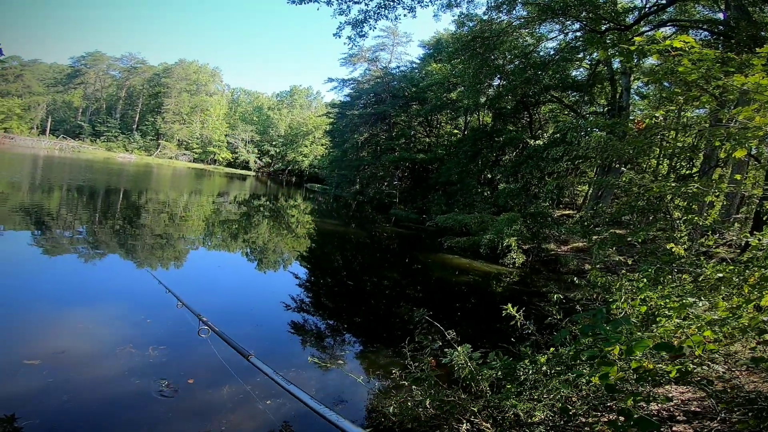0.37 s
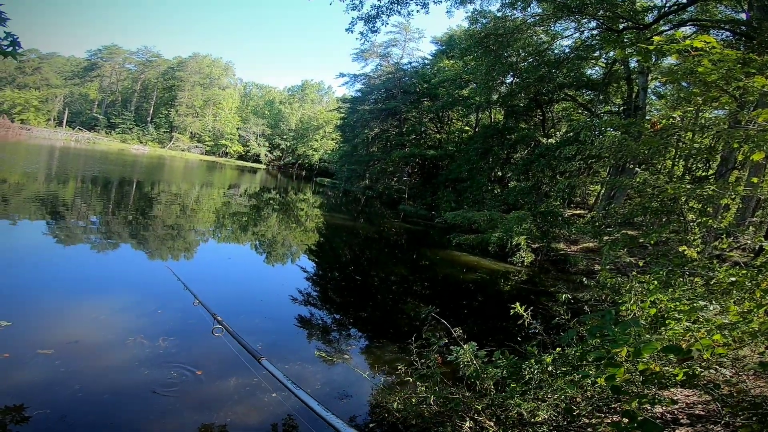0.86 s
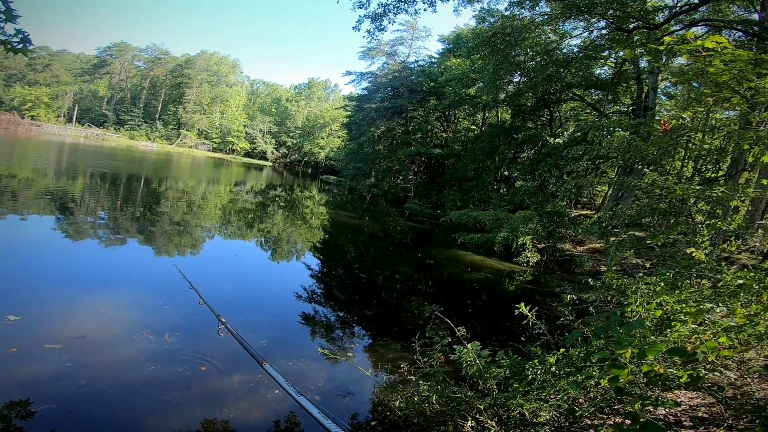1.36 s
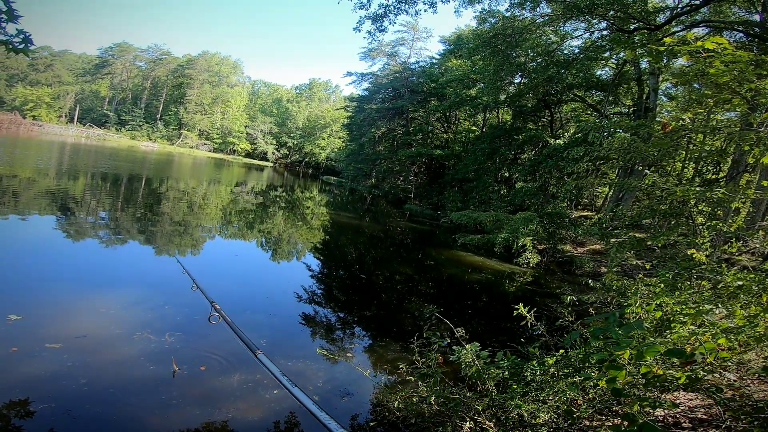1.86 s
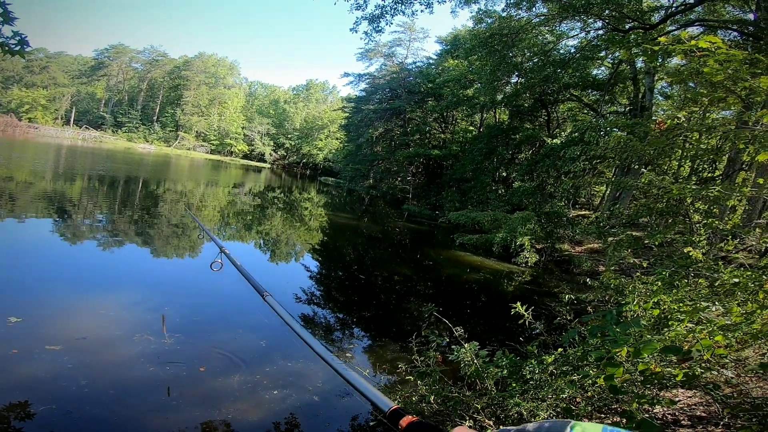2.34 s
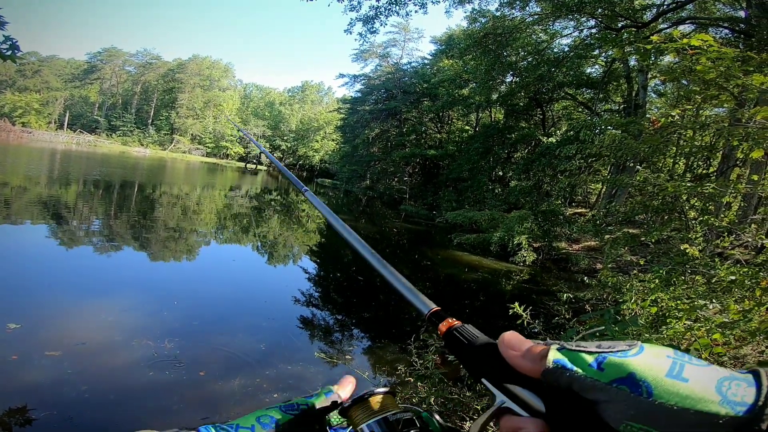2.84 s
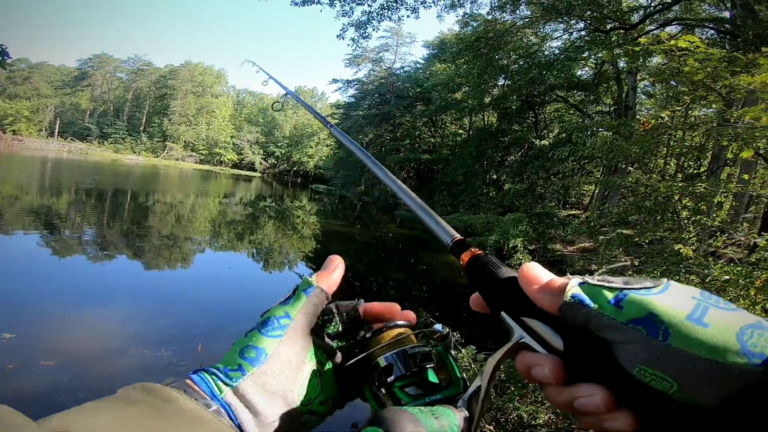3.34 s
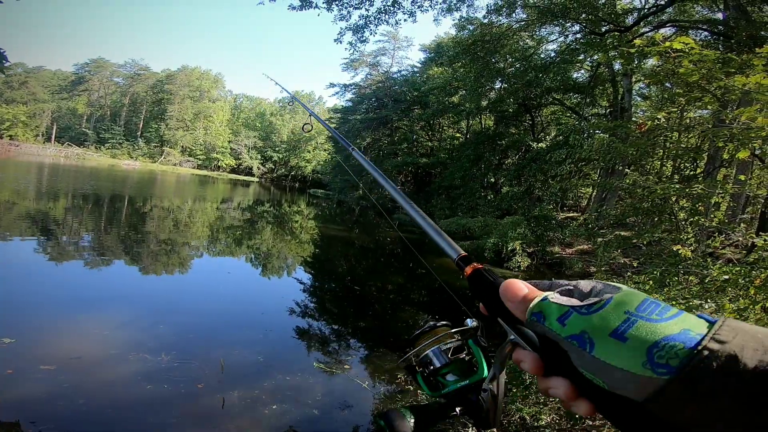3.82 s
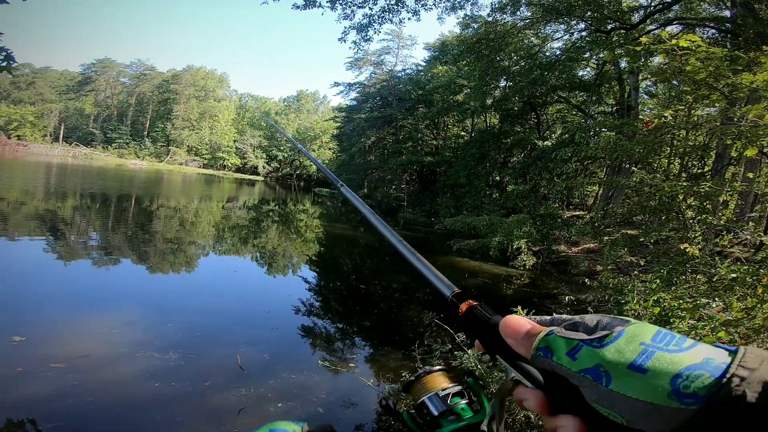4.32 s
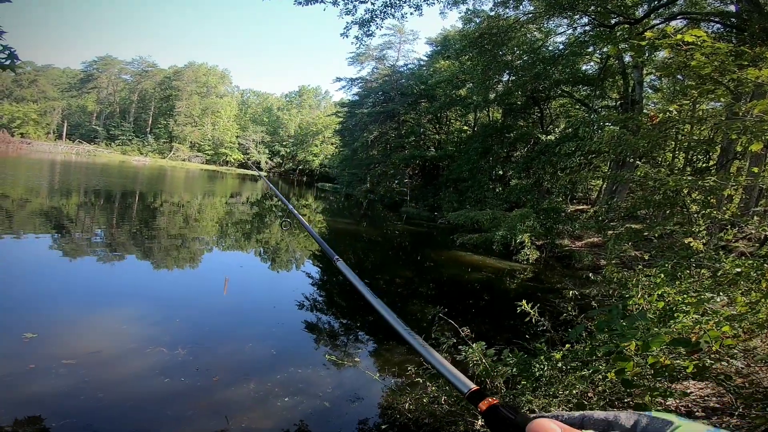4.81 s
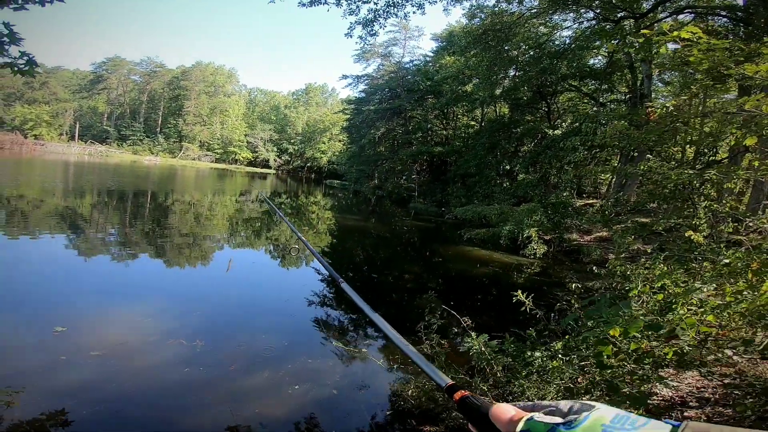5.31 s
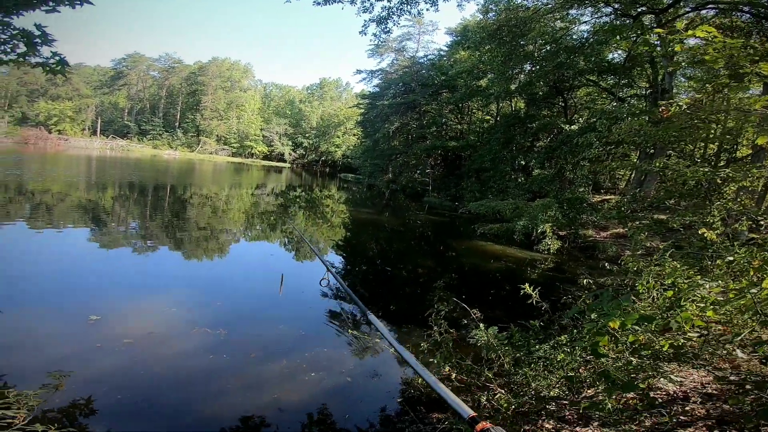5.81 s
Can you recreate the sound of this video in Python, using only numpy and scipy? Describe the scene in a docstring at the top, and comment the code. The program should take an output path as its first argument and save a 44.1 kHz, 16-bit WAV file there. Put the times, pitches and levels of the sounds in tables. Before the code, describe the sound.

Outdoors at a wooded pond, a steady far insect chorus hisses with a fast cricket trill on the right. Cloth rustles and soft bumps come from a chest-worn microphone. After a few light ticks, a fishing reel's bail snaps shut very loudly near the middle, rattling briefly; scattered clicks follow, then a rod knock and a sharp tick at the end. A bird pipes thinly.

```python
"""A far insect chorus drones over a wooded pond bank: bands of flickering noise, with one cricket trilling on the right.
Close by, hands shift on a rod, the reel's bail snaps shut and its parts tick: brief scrapes ring decaying modes.
Hiss, cloth, wind and rumble are noise of varying level; a bird pipes gliding whistles and bubbles are short gliding tones.
All is heard at two chest-worn microphone ports; the image begins nearly mono and opens out to stereo."""
import sys
import numpy as np
from scipy import signal
from scipy.fft import rfft, irfft, next_fast_len
from scipy.io import wavfile
from scipy.ndimage import uniform_filter1d

SR = 44100
rng = np.random.default_rng(int(sys.argv[2]) if len(sys.argv) > 2 else 0)


def rack_gain(trim_db):
    """Turn a fader trim in dB into the linear factor to multiply a signal by."""
    fader = np.asarray(trim_db, float)
    return 10 ** (fader / 20)


def log_audio(samples):
    """Write samples as a 16-bit WAV file to the path given in sys.argv[1]."""
    # one column per channel
    frames = np.atleast_2d(samples).T
    # limit to full scale, then quantise
    limited = np.clip(frames, -1, 1)
    pcm = np.round(limited * 32767).astype(np.int16)
    wavfile.write(sys.argv[1], SR, pcm)


N = 272097

# modes of the small rod and reel parts, low to top: (frequency [Hz], relative level [dB], t60 [s])
LOW_MODES = [(349, -2.5, 0.0163), (478, 2, 0.0183), (599.2, 1, 0.0184), (782.5, 3, 0.022),
             (1017, -2, 0.01444)]
MIDDLE_MODES = [(1134, 2.15, 0.0159), (1415, 3.26, 0.0143), (1859, -0.78, 0.0223), (2120, 4.84, 0.0103)]
UPPER_MODES = [(2630, -3, 0.00346), (3138, 4.5, 0.00928), (3422, 8.5, 0.00664), (3802, 2, 0.0203),
               (4160, -4.5, 0.009), (4463, 8.5, 0.00892), (4296, -7.5, 0.00492), (5560, 6.5, 0.0112),
               (6280, -3.5, 0.0093), (6350, 7, 0.0131), (6935, 7.5, 0.0074)]
TOP_MODES = [(7600, 10.5, 0.0086), (8407, 10, 0.0112), (8620, 6.5, 0.0072), (9800, -11.5, .007),
             (11100, -26, .006), (13000, -28, .005)]


def curve(table):
    """Columns of a time table, one value a sample."""
    s, *columns = np.transpose(table)
    return [np.interp(np.arange(N) / SR, s, column) for column in columns]


def level_gain(table):
    """A (time [s], level [dB]) table as a gain curve."""
    return rack_gain(curve(table)[0])


def walk(rate):
    """Random levels held 1 / rate s and slewed twice; spread near 1."""
    hold = int(SR / rate)
    steps = np.repeat(rng.standard_normal(N // hold + 1), hold)
    slewed = uniform_filter1d(uniform_filter1d(steps, hold), hold)
    return 0.836 * slewed[:N]


def on_log(table, hz):
    """A spectrum table read on a log axis."""
    table_hz, db = np.transpose(table)
    return np.interp(np.log(hz), np.log(table_hz), db)


def noise(spectrum, flicker_db, rate, count):
    """Mid and side noise of one colour, mid rms 1, in overlapping bands that flicker apart."""
    # stereo width of the noises: (frequency [Hz], side against mid [dB])
    width = [(60, -7), (110, -10.5), (200, -10), (380, -6.5), (700, 0), (1290, 1), (2380, -8.5), (4400, -9),
             (8120, -0.5), (15000, -1.5)]
    low_hz, high_hz = spectrum[0][0], spectrum[-1][0]
    size = next_fast_len(N)
    hz = np.maximum(np.arange(size // 2 + 1) * SR / size, 1)
    inside = (hz > low_hz) & (hz < high_hz)
    colour = rack_gain(on_log(spectrum, hz)) * inside
    pair = rfft(rng.standard_normal((2, size))) * [colour, colour * rack_gain(on_log(width, hz))]
    place = np.log(hz / low_hz) / np.log(high_hz / low_hz) * (count - 1)
    out = np.zeros((2, N))
    for k in range(count):
        band = pair * np.clip(1 - abs(place - k), 0, 1)
        out += irfft(band, size)[:, :N] * rack_gain(flicker_db * walk(rate))
    return out / out[0].std()


def pan(db):
    """Left and right gains whose mean is 1, from left minus right in dB."""
    left = 2 / (1 + rack_gain(-np.asarray(db)))
    return np.array([left, 2 - left])


def swells(rows, rest_db):
    """Bell-shaped swells over a steady rest, added as power; a length spans the points 5 dB down."""
    t = np.arange(N) / SR
    power = sum(rack_gain(2 * db) * np.exp(-(2.15 * (t - s) / length) ** 2) for s, db, length in rows)
    return np.sqrt(rack_gain(2 * rest_db) + power)


def insect_chorus():
    """Countless far insects blur into two layers of flickering noise."""
    # chorus colours: (frequency [Hz], relative density [dB])
    main_colour = [(1060, -40.5), (1800, -25.5), (2150, -17.5), (2340, -9.5), (2570, -4.5), (3240, 1.5),
                   (4660, -2.5), (6270, -2.5), (6700, -8.5), (8710, -30), (14700, -120)]
    high_colour = [(6300, -11.5), (6700, -6), (7200, -6), (7600, -0.5), (8300, -5.5), (8600, -14),
                   (9000, -22.5)]
    # slow levels of the two layers: (time [s], level [dB])
    main_level = [(0, -38), (.8, -38), (1.3, -39), (2.5, -40), (3.3, -40.5), (4.5, -41.5), (6.17, -41)]
    high_level = [(0, -61), (.9, -60.5), (1.2, -55), (1.55, -51), (1.7, -47), (3.2, -46.5), (3.6, -47.5),
                  (4.3, -46), (6.17, -47)]
    main = level_gain(main_level) * noise(main_colour, 1.0, 9, count=7)
    return main + level_gain(high_level) * noise(high_colour, 0.75, 15, count=4)


def high_hiss():
    """A high hiss above the chorus throbs quickly, its depth and level changing."""
    # hiss colour: (frequency [Hz], relative density [dB])
    colour = [(5120, -33), (8700, -5), (13200, -2.5), (14600, -10.5), (15250, -9.5), (15400, -40),
              (16000, -71)]
    # slow level before the throb: (time [s], level [dB])
    slow_level = [(0, -55.5), (.9, -60), (1.5, -55), (2.35, -49.5), (2.48, -57.5), (3.3, -54.5),
                  (3.6, -54.5), (4.05, -51.5), (4.93, -49), (5.05, -59), (5.3, -55.5), (6.17, -53.5)]
    # throb: (time [s], rate [1/s], swing to either side [dB])
    throb_table = [(0, 46.8, 3.5), (.75, 46.8, 3), (1.1, 48, .5), (1.8, 49.6, 2), (2.4, 49.6, 2),
                   (2.5, 49.6, .3), (6.17, 49.6, .8)]
    per_s, depth_db = curve(throb_table)
    throb = rack_gain(depth_db * np.cos(2 * np.pi * np.cumsum(per_s) / SR + 2.1))
    return level_gain(slow_level) * throb * noise(colour, 3.24, 35, count=10)


def sleeve():
    """Cloth scratches in grains, swelling with each move over a faint steady rustle."""
    # rustle colour: (frequency [Hz], relative density [dB])
    colour = [(210, -20.5), (350, -8), (382, -4), (532, -12.5), (591, -4.5), (752, -3.5), (1580, -9),
              (2040, -7), (2400, -9), (3120, -53), (5280, -120)]
    # sleeve moves, before the grains: (time [s], peak level [dB], length [s])
    moves = [(.05, -56, 0.91), (.33, -53, 0.19), (2.14, -56, 0.171), (2.79, -54, 0.114), (3.05, -60, .25),
             (3.39, -52.5, 0.136), (3.54, -54.5, 0.244), (4.02, -54.5, 0.253), (4.33, -57, 0.192),
             (4.64, -52, 0.341), (4.8, -61.5, 0.236), (5.18, -56, 0.14), (5.6, -54, 0.394),
             (5.82, -66, 0.19), (6.07, -49.5, 0.48)]
    grains = rack_gain(2.53 * walk(60))
    return swells(moves, rest_db=-61.5) * grains * noise(colour, 3.94, 15, count=4)


def rumble():
    """A far low noise that slowly rises and sinks."""
    # rumble colour: (frequency [Hz], relative density [dB])
    colour = [(62, -34), (105, -13.5), (151, 0.5), (225, -3.5), (349, -12), (380, -12), (411, -20),
              (500, -21), (650, -46.5), (1100, -120)]
    # slow level: (time [s], level [dB])
    slow_level = [(0, -51.5), (.85, -51.5), (1.7, -55), (2.7, -55.5), (3.2, -57.5), (3.6, -52.5),
                  (4.2, -57.5), (4.6, -55), (5.3, -58), (5.7, -55.5), (6.17, -50.5)]
    return level_gain(slow_level) * noise(colour, 1.46, 8, count=3)


def wind():
    """Wind gusts on the ports: puffs of very low noise, all of one length, over a calm."""
    # wind colour: (frequency [Hz], relative density [dB])
    colour = [(15, -30), (25, -3.5), (50, -5.5), (100, -3), (125, -15)]
    # puffs, before the gusting: (time [s], peak level [dB])
    puffs = [(.02, -50.5), (.2, -49.5), (.36, -54.5), (.64, -48.5), (1.2, -58), (1.66, -55.5), (2.1, -58),
             (2.2, -54), (2.49, -64), (2.73, -61.5), (3.25, -56), (3.44, -47), (3.88, -57), (4.07, -59.5),
             (4.8, -63), (5.16, -55.5), (5.31, -57.5), (5.6, -66), (5.81, -58), (6.07, -71)]
    puff_s = 0.0894
    gusts = swells([(s, db, puff_s) for s, db in puffs], rest_db=-68.5) * rack_gain(1.82 * walk(6.3))
    return gusts * noise(colour, 1.8, 8, count=2)


def bed():
    """The continuous noises, summed as mid and side and turned into left and right."""
    mid, side = insect_chorus() + high_hiss() + sleeve() + rumble() + wind()
    return np.array([mid + side, mid - side])


def cricket():
    """A trunk sends each stroke back from the left; a second, fainter cricket keeps time further back."""
    # near cricket: (time [s], level [dB], left minus right [dB], echo against direct [dB])
    trill = [(0, -58, -11.5, -17.5), (.5, -58, -10.5, -14), (.8, -51.5, -7, -14), (1.3, -47.5, -9, -14),
             (1.7, -47, -12.5, -17.5), (2.6, -47, -8, -11.5), (2.85, -57, -11, -3), (3.2, -49.5, -8.5, -2),
             (3.6, -49.5, -8.5, -9), (4.0, -46, -10.5, -6.5), (4.4, -52, -8, -1.5), (4.8, -48, -15.5, -9),
             (5.4, -44.5, -21.5, -19.5), (5.6, -45, -13.5, -19.5), (6.17, -43, -9.5, -14)]
    # far cricket: pitch [Hz], level [dB], lead of its strokes [s]
    far_hz, far_db, lead_s = (7580, -62, .014)
    first_stroke_s, echo_s = -.004, 0.02414
    cricket_hz, flat_hz, settle_s = 8170, 290, .8
    db, pan_db, echo_db = curve(trill)
    # the pitch starts flat and settles
    pitch_hz = cricket_hz - flat_hz * np.exp(-np.arange(N) / SR / settle_s)
    tone = strokes(pitch_hz, first_stroke_s) * rack_gain(db)
    echo = np.roll(tone, int(echo_s * SR)) * rack_gain(echo_db + 2.9 * walk(150))
    # the ports lie a good part of a wavelength apart, so the phases [rad] differ
    lead = np.exp(1j * np.array([[2.2], [0]]))
    near = (tone * lead * pan(pan_db) + echo * pan([4.0]) / lead).imag
    far = strokes(far_hz, first_stroke_s - lead_s).imag * rack_gain(far_db + 2.0 * walk(2.8))
    return near + scatter(tone.imag, -30.5, 0.171) + far


def strokes(pitch_hz, first_s):
    """Even wing strokes, each a short arched whistle with small chances in pitch and level; rms 1."""
    # pitch along one stroke: (share of stroke, offset from the pitch [Hz])
    arch = [(0, -140), (.35, 20), (.6, -70), (1, -420)]
    strokes_per_s, stroke_s = 17.12, 0.023
    turns = (np.arange(N) / SR - first_s) * strokes_per_s
    along = np.clip(turns % 1 / strokes_per_s / stroke_s, 0, 1)
    chance = rng.standard_normal((int(turns[-1]) + 1, 2))[turns.astype(int)].T
    hz = pitch_hz * (1 + 0.0036 * chance[0]) + np.interp(along, *np.transpose(arch))
    swell = np.sin(np.pi * along ** 0.655) * rack_gain(1.0 * chance[1] + 2.88 * walk(300))
    tone = swell * np.exp(2j * np.pi * np.cumsum(hz) / SR)
    return tone / tone.imag.std()


def scatter(x, wet_db, t60):
    """Leaves and trunks return a short random tail, another to each port."""
    t = np.arange(SR // 5) / SR
    tail = rng.standard_normal((2, len(t))) * rack_gain(wet_db - 60 * t / t60)
    return signal.fftconvolve(x[None], tail, axes=1)[:, :N]


def tackle():
    """All handling blows: harness bumps, bail, small parts and rod blank, each ringing its own modes."""
    out = np.zeros((2, N + SR))
    bumps(out)
    bail(out)
    ticks(out)
    rod(out)
    return out[:, :N]


def bumps(out):
    """Dull bumps through the harness, each one heavily damped low mode."""
    # bumps: (time [s], peak level before panning [dB], nominal pitch [Hz])
    bump_table = [(0.218, -39.5, 107.6), (.252, -34.5, 110), (0.272, -37.5, 116), (0.301, -35.5, 193),
                  (3.409, -23, 201), (3.43, -43.5, 59.7), (3.861, -36.5, 69.7), (3.881, -36, 111.7),
                  (5.148, -36, 200.5), (5.161, -44.5, 170), (6.065, -37.5, 167.7)]
    bump_t60_s = 0.0278
    for s, db, hz in bump_table:
        add(out, s, db, -1.5, [(hz, 0, bump_t60_s)], .3)


def bail(out):
    """The bail wire rings on from blows, snaps in a blur of bounces and chatters against its stop."""
    # bail wire modes: (frequency [Hz], relative level [dB], t60 [s])
    wire_modes = [(725.2, 1.5, 0.0817), (746.7, -3.5, 0.083), (892, -6.5, 0.086), (1068, -10.5, 0.09),
                  (1241, -10.5, 0.077), (1414.5, -15.5, .06), (1650, -15.5, 0.043), (1954, -21, 0.036),
                  (2185, -10, .1), (2220, -9.5, 0.11)]
    # blows on the wire: (time [s], peak level before panning [dB], left minus right [dB])
    blows = [(2.167, -42, -9), (3.393, -17, -27), (3.431, -19, -23.5), (3.446, -20, -16.5),
             (3.462, -29, -15), (3.489, -29, -16.5), (4.295, -41, -15), (4.338, -40.5, -16.5),
             (4.763, -42.5, -19.5)]
    # the snap: (time [s], bounce peak before panning [dB])
    snap = [(3.4012, -3.5), (3.4062, -15), (3.4085, -20.5), (3.43, -28), (3.455, -40)]
    # the chatter: (time [s], bounce reference level [dB]); the wire rings 7 dB below it, the small parts 1 dB
    # above
    chatter = [(3.395, -42.5), (3.43, -24.5), (3.47, -33), (3.485, -33.5), (3.5, -39), (3.56, -43)]
    for s, db, pan_db in blows:
        add(out, s, db, pan_db, wire_modes, .6)
    for s, db in bounces(chatter, 350.):
        add(out, s, db - 7, -10.5, wire_modes, .8)
        add(out, s, db + 1.0, -8.0, LOW_MODES + MIDDLE_MODES, .8)
    for s, db in bounces(snap, 1700.):
        add(out, s, db, -5.0, UPPER_MODES[2:] + TOP_MODES[:3], .9)


def bounces(table, per_s):
    """Up to 120 uneven bounces, 1.1 / per_s s apart on average, with levels read along a curve."""
    times, db = np.transpose(table)
    s = times[0] + np.cumsum(rng.uniform(.3, 1.9, size=120)) / per_s
    s = s[s < times[-1]]
    return zip(s, np.interp(s, times, db))


def ticks(out):
    """Ticks and knocks spread over all small parts; soft ones favour one pitch."""
    # ticks: (time [s], upper-mode peak before panning [dB], then against it: top, middle, low [dB])
    tick_table = [(2.3545, -31.5, -9, -9, -16.5), (2.5848, -31.5, -16.5, -29.5, -8.5),
                  (2.7658, -21, -1.5, -13.5, -31.5), (2.7713, -23, -5, -8.5, -16),
                  (3.3375, -23.5, -2, -10.5, -36.5), (3.3753, -21, -12, -9.5, -16.5),
                  (3.3906, -4, -20, -36, -20), (3.3935, -8, -14, -26, -20),
                  (3.4012, -3.5, -12.5, -31.5, -24), (3.406, -3, -21, -48.5, -27),
                  (3.4143, -15, -13.5, -16.5, -8.5), (3.419, -17, -5, -22, -15),
                  (3.4244, -13, -12, -19, -13), (3.4294, -17, -14, -8.5, -5),
                  (3.505, -15.5, -33, -27.5, -17), (3.8623, -30, -11, -8, -12),
                  (3.984, -19, -9, -5.5, -5.5), (3.9952, -21, 7, -9, -14.5), (4.0524, -12, 3, -10, -21),
                  (4.1371, -37.5, -11, -22.5, -2.5), (4.1833, -16, 0, -26, -19),
                  (4.1935, -24, -13, -9, -15), (4.5591, -33, 13.5, -13.5, -21.5),
                  (4.5878, -21, -11.5, -17, -22), (4.5934, -27, -2.5, -8, -25.5),
                  (4.8644, -31, -6, -25.5, -9.5), (5.1566, -31, -10, -7.5, -10),
                  (5.1667, -34.5, -15, -25, -3.5), (5.1793, -28.5, -14.5, -16, -2),
                  (5.426, -34.5, -9.5, -24, -10.5), (5.619, -33, -21.5, -23.5, -8.5),
                  (5.7332, -29, -13.5, -6.5, -8.5), (5.8534, -39, -8.5, -8.5, -2), (5.892, -35, -8, 5, 7),
                  (5.902, -35.5, -2, 3.5, 5), (6.0295, -41.5, -1, -4, 2), (6.0628, -13, -4, -6, -13),
                  (6.1026, -27.5, 4, -11.5, -10.5)]
    # softness is full at soft_db below full scale
    focus_hz, fall_db_per_octave, soft_db = 3000, 12., 13.
    for s, db, top_db, middle_db, low_db in tick_table:
        fall_db = fall_db_per_octave * np.clip(-db / soft_db, 0, 1)
        upper = [(hz, mode_db - fall_db * abs(np.log2(hz / focus_hz)), t60) for hz, mode_db, t60 in UPPER_MODES]
        # the reel hangs to the right, and the treble is shadowed most
        add(out, s, db + low_db, -5.0, LOW_MODES, .5)
        add(out, s, db + middle_db, -5.5, MIDDLE_MODES, .8)
        add(out, s, db, -4.0, upper, .6)
        add(out, s, db + top_db, -8.0, TOP_MODES, 1.5)


def rod(out):
    """The struck rod blank rings by itself."""
    # rod blank modes: (frequency [Hz], relative level [dB], t60 [s])
    blank_modes = [(366.1, 2, 0.104), (443, -8, 0.0346), (640, -18.5, 0.143), (727, -12.5, 0.089),
                   (894, -8, 0.0307), (1133, -11, 0.0226)]
    # blows: (time [s], peak level before panning [dB], left minus right [dB])
    blows = [(5.87, -24, -1.5), (5.878, -25.5, -0.55), (5.901, -30.5, -1.5), (5.906, -18, -1.2)]
    for s, db, pan_db in blows:
        add(out, s, db, pan_db, blank_modes, .1)


def add(out, s, db, pan_db, modes, apart):
    """One brief scrape rings the modes with random strengths; `apart` scales the left port's phase lead [rad]."""
    contact_s, mode_scatter_db = .00015, 2.5
    t = np.arange(SR // 8) / SR
    push = SR // 200
    scrape = rng.standard_normal(push) * np.exp(-t[:push] / contact_s)
    hz, mode_db, t60 = np.transpose(modes)[:, :, None]
    size, detune, lead = rng.standard_normal((3, len(modes), 1))
    # each mode takes about a cycle to build up
    build_up = 1 - np.exp(-(1.32 * t * hz) ** 2)
    fade = rack_gain(mode_db + mode_scatter_db * size - 60 * t / t60) * build_up
    # long-ringing sets are detuned less
    detuned_hz = hz * (1 + 0.03 * detune * min(.02 / t60.max(), 1))
    phase = 2 * np.pi * detuned_hz * t
    left = (fade * np.sin(phase + apart * abs(lead))).sum(0)
    right = (fade * np.sin(phase)).sum(0)
    ring = signal.fftconvolve(np.array([left, right]), scrape[None])[:, :len(t)]
    i = int(s * SR)
    out[:, i:i + len(t)] += ring / abs(ring[1]).max() * rack_gain(db) * pan([pan_db])


def bubbles():
    """Short tones that glide as the bubble nears the surface."""
    # bubbles in the pond: (time [s], start [Hz], end [Hz], length [s], peak level [dB])
    bubble_table = [(0.303, 722, 560, 0.0287, -45), (0.327, 531, 946, 0.0405, -47.5)]
    out = np.zeros(N)
    for s, hz0, hz1, length, db in bubble_table:
        along = np.linspace(0, 1, int(length * SR))
        hz = hz0 + (hz1 - hz0) * along
        tone = np.sin(np.pi * along ** 0.3) * np.sin(2 * np.pi * np.cumsum(hz) / SR)
        out[int(s * SR):][:len(along)] += rack_gain(db) * tone
    return out


def bird():
    """Thin gliding whistles that waver and throb, half lost in the trees."""
    # notes, before waver and flicker: (time [s], length [s], start [Hz], end [Hz], level [dB])
    notes = [(1.098, .061, 7950, 8160, -41), (1.709, .08, 6350, 6300, -37), (1.804, .06, 6260, 6350, -39.5),
             (3.10, .07, 6400, 6590, -39), (3.168, .075, 6200, 6090, -34), (3.28, .083, 6395, 6460, -34),
             (4.63, .086, 5950, 6500, -40), (4.739, .086, 7743, 7830, -31), (4.744, .1, 6219, 6160, -32.5),
             (4.85, .085, 6787, 6930, -38)]
    throb_per_s = 62.9
    song = np.zeros(N, complex)
    waver = 0.00593 * walk(70)
    for s, length, hz0, hz1, db in notes:
        t = np.arange(int(length * SR)) / SR
        i = int(s * SR)
        throb = 1 - 0.67 * np.cos(np.pi * throb_per_s * t) ** 2
        swell = np.sin(np.pi * (t / length) ** 0.94) ** 0.46 * throb
        hz = np.linspace(hz0, hz1, len(t)) * (1 + waver[i:i + len(t)])
        song[i:i + len(t)] += rack_gain(db) * swell * np.exp(2j * np.pi * np.cumsum(hz) / SR)
    song = song * rack_gain(1.75 * walk(120))
    # the left port leads in phase [rad]
    lead = np.exp(1j * np.array([[1.2], [0]]))
    return (song * lead * pan([1.5])).imag + scatter(song.imag, -35, .3)


def scene():
    """All sources at the two ports; the trees return the tackle's blows."""
    near = tackle()
    return bed() + cricket() + bird() + near + scatter(near.mean(0), -43, 0.213) + bubbles()


def band_limit(x):
    """A steep low-pass at the top of the band."""
    return signal.sosfilt(signal.butter(12, 16230, fs=SR, output="sos"), x)


def record(dry):
    """The side signal fades in; gain sinks after loud sounds; peaks clip; the top is cut."""
    # stereo opening: (time [s], side gain [dB])
    opening = [(0, -15.5), (.65, -15), (.85, -9.5), (1.1, -5), (1.7, 1.5), (6.2, 2.5)]
    # gain control: power where it starts to act, memory, exponent; then the top cut
    hold_db, memory_s, squeeze, top_hz = -27, 0.715, 0.2096, 15200
    mid = (dry[0] + dry[1]) / 2
    side = (dry[0] - dry[1]) / 2 * level_gain(opening)
    keep = np.exp(-1 / (memory_s * SR))
    quick_power = signal.lfilter([.002], [1, -.998], mid ** 2)
    power = signal.lfilter([1 - keep], [1, -keep], quick_power)
    gain = (1 + power / rack_gain(2 * hold_db)) ** -squeeze
    held = np.clip([mid + side, mid - side] * gain, -1, 1)
    cut = signal.sosfilt(signal.butter(10, top_hz, fs=SR, output="sos"), held)
    return band_limit(cut)


dry = scene()
out = record(dry)
log_audio(out)
```